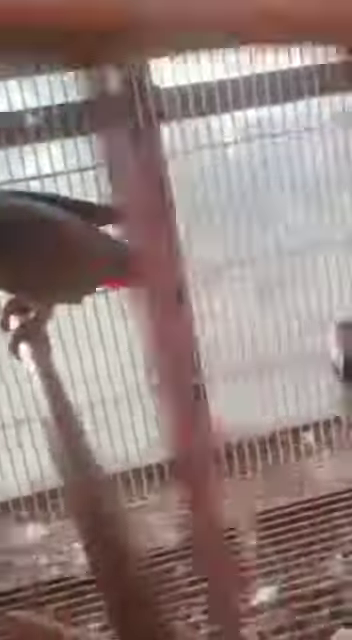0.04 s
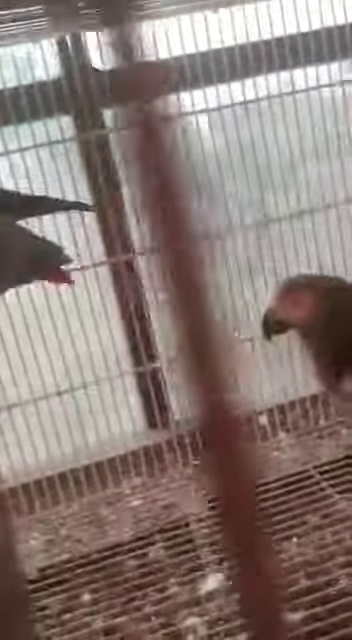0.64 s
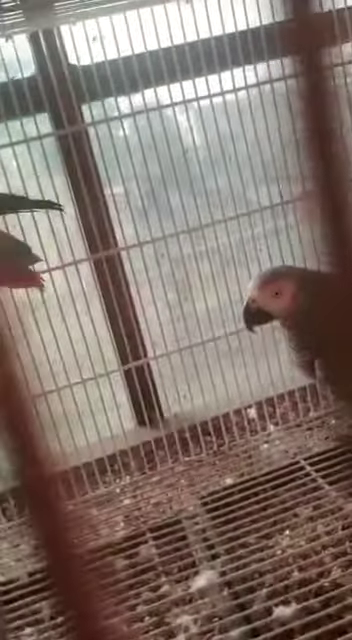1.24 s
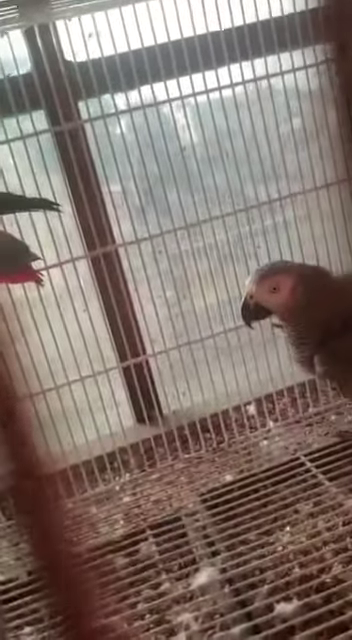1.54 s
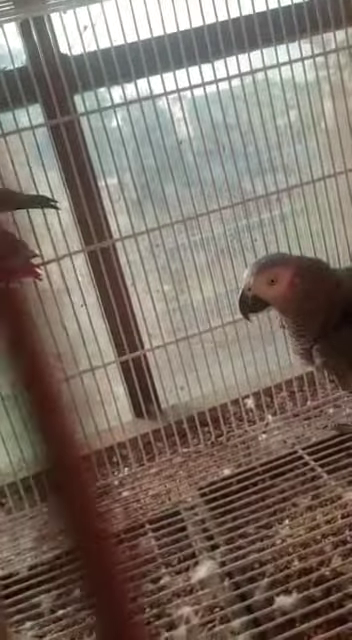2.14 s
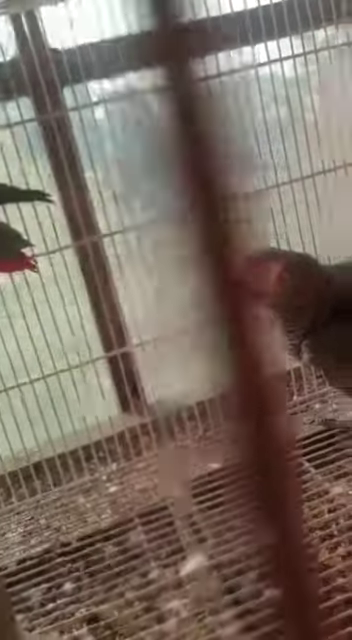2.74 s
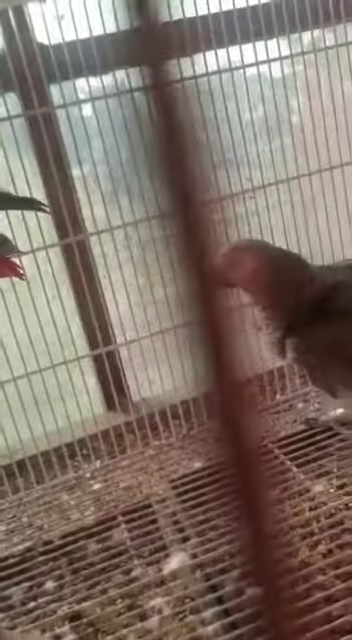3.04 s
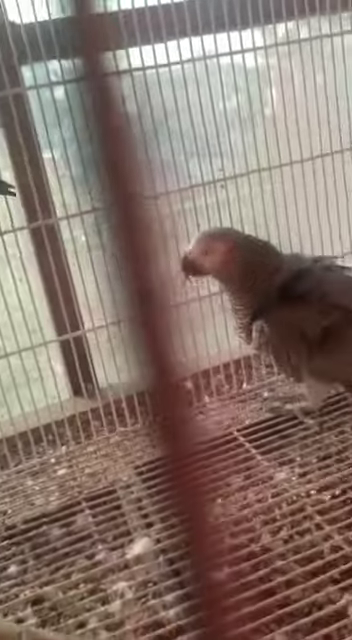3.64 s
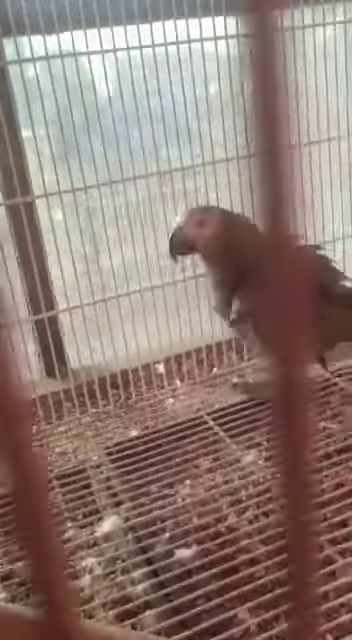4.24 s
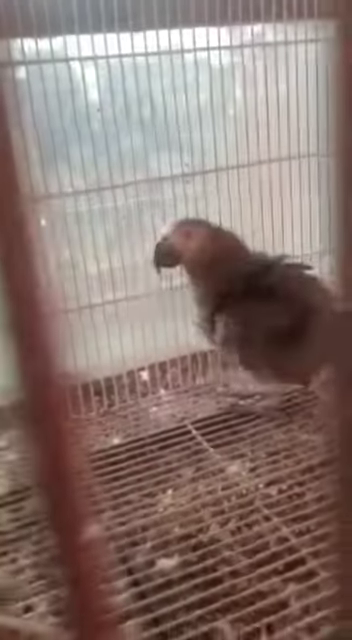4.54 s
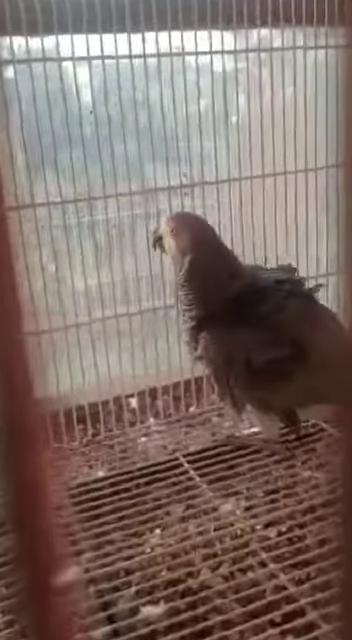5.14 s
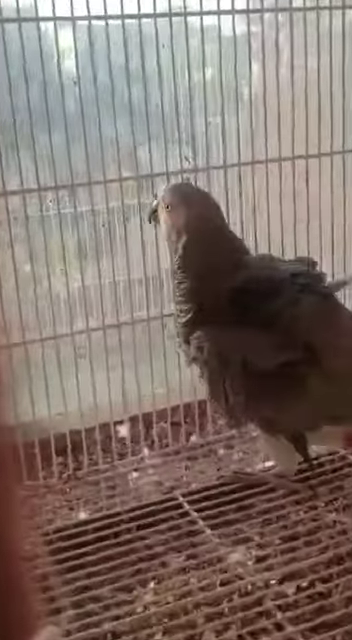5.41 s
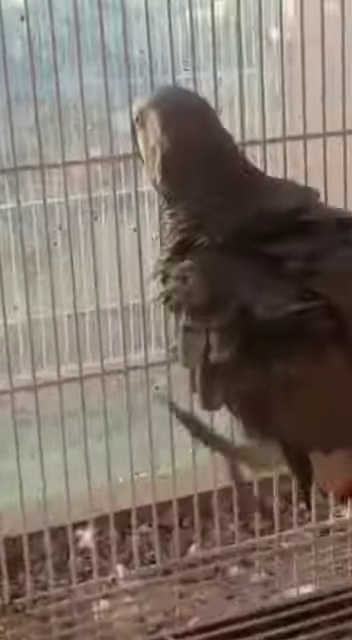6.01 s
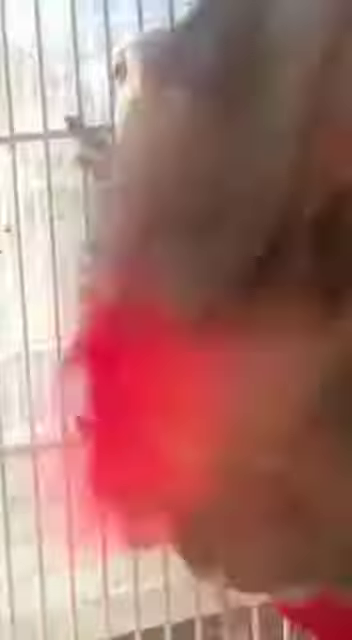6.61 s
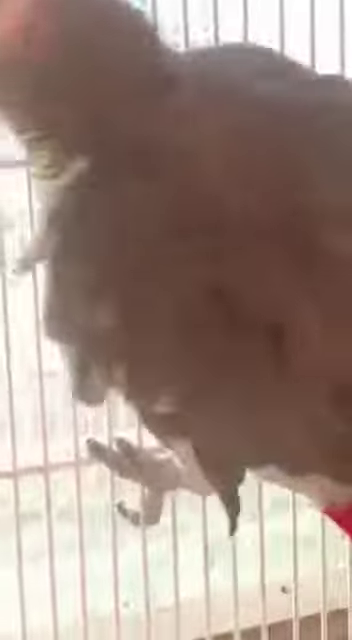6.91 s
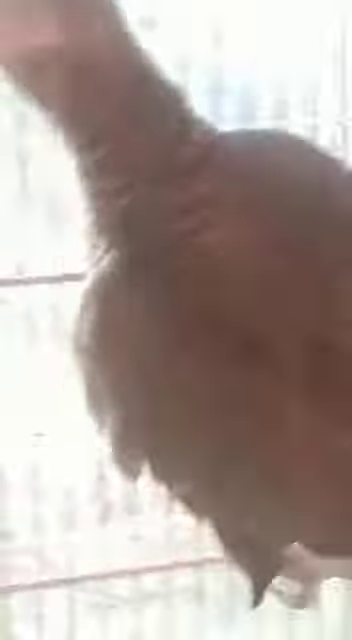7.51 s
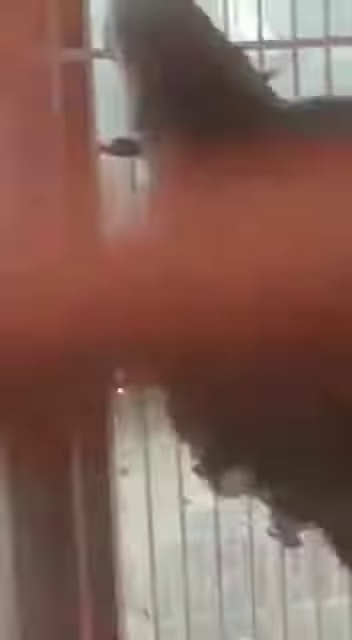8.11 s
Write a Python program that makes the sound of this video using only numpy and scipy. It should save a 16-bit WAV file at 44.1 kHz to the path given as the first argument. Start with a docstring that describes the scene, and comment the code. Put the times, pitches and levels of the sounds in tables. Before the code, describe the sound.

Loud, raspy growls from a caged parrot come in bursts, with soft hisses and throaty rattles between them. One short chirp sounds before the second growl. The wire cage is knocked now and then, more often towards the end, where ticks and light rustling join three quicker growls. The microphone is close, the sound leans left, and the small room rings briefly over a faint hum.

```python
"""A small room, with a wire cage close to a phone whose right port is half covered.
A grey parrot growls harshly seven times: its syrinx flutters and drives the resonances of windpipe
and beak. Between growls come a thin hiss of forced air, a low throaty rattle and one whistled chirp.
Now and then there are knocks on the cage, short bright scrapes and ticks, and faint rustles of
feathers or handling, over a faint rumble and hum. The room rings briefly."""
import sys
import numpy as np
from scipy import signal
from scipy.fft import rfft, irfft, next_fast_len
from scipy.io import wavfile
from scipy.ndimage import uniform_filter1d, minimum_filter1d

SR = 44100
rng = np.random.default_rng(int(sys.argv[2]) if len(sys.argv) > 2 else 0)


def waveform_to_disk(signal):
    """Save audio, clipped to [-1, 1], as 16-bit WAV at the path in sys.argv[1]."""
    frames = np.transpose(np.atleast_2d(signal))
    scaled = np.clip(frames, -1, 1) * 32767
    samples = np.round(scaled).astype(np.int16)
    wavfile.write(sys.argv[1], SR, samples)


N = 364266
TIME = np.arange(N) / SR


def amp(db):
    """Decibels to gain."""
    return 10 ** (np.asarray(db) / 20)


def unit(x):
    """Scales to rms 1."""
    return x / np.sqrt(np.mean(x ** 2) + 1e-20)


def at_hz(points, hz):
    """Reads a spectrum on a log-frequency axis."""
    f, value = np.transpose(points)
    return np.interp(np.log(hz + 1), np.log(f + 1), value)


def ride(points):
    """Follows a fader curve through the whole scene."""
    return np.interp(TIME, *np.transpose(points))


def add(mix, start, sound):
    """Mixes a sound in at start seconds."""
    part = mix[max(round(start * SR), 0):][:len(sound)]
    part += sound[:len(part)]


def wander(t, per_s):
    """Random drift that heads for a new value per_s times a second."""
    return np.interp(t * per_s, np.arange(20000), rng.standard_normal(20000))


def colour(x, points):
    """Minimum-phase EQ with the given curve."""
    log_gain = np.log(amp(at_hz(points, abs(np.fft.fftfreq(8192, 1 / SR)))))
    taps = np.fft.ifft(np.exp(np.conj(signal.hilbert(log_gain)))).real[:4096]
    return signal.oaconvolve(x, taps)[:len(x)]


def steady(x):
    """Evens out the slow level and keeps the single pulses."""
    return x / np.sqrt(abs(uniform_filter1d(x ** 2, 2600)) + 1e-12)


def fade(x, size=300):
    """Softens both ends over size samples."""
    edge = np.minimum(np.arange(len(x)), np.arange(len(x))[::-1])
    return x * np.minimum(edge / size, 1)


def formant(x, hz, width):
    """Two resonators in series follow the curve hz: a steep-sided peak of steady level."""
    turn = np.exp(2j * np.pi * np.cumsum(hz) / SR)
    pole = np.exp(-np.pi * width / SR)
    for _ in range(2):
        x = 2 * (turn * signal.lfilter([1 - pole], [1, -pole], x / turn + 1e-18)).real
    return steady(x)


def syrinx(t, rate, rough, weak_db, jitter, puff_s, leak):
    """A membrane slaps unevenly, strong and weak in turn; each slap lets out a puff of air."""
    cycle = np.cumsum(rate * np.exp(jitter * rough * wander(t, 170))) // SR
    size_db = weak_db * (cycle % 2) + 3.5 * np.clip(rng.standard_normal(len(t)), -2, 1)
    slaps = np.diff(cycle, prepend=-1) * amp(size_db)
    age = np.arange(400) / SR / puff_s
    flow = unit(signal.oaconvolve(slaps, age * np.exp(-age))[:len(t)])
    puffs = unit((leak + flow) * rng.standard_normal(len(t)))
    breathiness = np.clip(0.41 + .5 * rough, 0, 1)
    return np.sqrt(1 - breathiness) * unit(slaps) + np.sqrt(breathiness) * puffs


def effort(t, stutter_s, length, attack_s, release_s):
    """A growl starts with one weak slap, jumps in below full effort, swells to it and lets go."""
    stutter = amp(-15.5) * np.exp(-t / 0.065)
    attack_db = -11.5 * np.exp(-np.maximum(t - stutter_s, 0) / attack_s)
    release_db = -60 * np.maximum(t - length, 0) / release_s
    return np.where(t < stutter_s, stutter, amp(attack_db + release_db))


# The broad rasp between the resonances. Each row: frequency in Hz, gain in dB.
RASP_EQ = [(200, -26), (450, -15), (640, -13), (800, -20), (930, -20), (1150, 4), (1400, 10), (2000, 13),
           (2600, 10.5), (3100, -1.5), (4000, -12), (5300, -15), (6100, -9), (7000, -9), (7700, -47),
           (9200, -13), (11200, -38.5), (12600, -15), (15800, -32.5)]
# The growls. Each row: start, stutter length, start of release, attack and release in seconds,
# effort and its change by the end in dB, slaps a second once loose, roughness and beak gape from 0 to 1,
# main (second) resonance at start and end in Hz, third and fourth resonances in Hz,
# levels of the third, fourth, fifth and the sizzle in dB. Tone is set for a loose syrinx and shut beak.
GROWL_CUES = [ (0.0, .002, .675, 0.02, 0.095, -8.5, -3.5, 142, 0.42, 0, 2025, 2144, 3390, 4440, -6.5, -7.5, -6.5, 7),
              (2.586, 0.0076, 3.576, 0.062, .12, -11, 2, 162, 0.47, 0, 1806, 1995, 3266, 4545, -10, -9, -14, -1),
              (4.01, .011, 4.79, 0.027, 0.14, -8.5, -2.5, 168, .47, 0.22, 1885, 2245, 3350, 4680, -6.5, -6, -8, 8.5),
              (5.424, 0.022, 6.212, 0.039, 0.034, -11.5, 1, 169, 0.33, .04, 2006, 2053, 3140, 4590, -9, -14.5, -9, -2),
              (6.529, 0.0075, 7.077, 0.0093, 0.072, -10.5, 0, 178, .75, 0.77, 2140, 2044, 3170, 4610, -5.5, -9, -5, 9.5),
              (7.337, .014, 7.63, 0.022, 0.037, -5.5, -8, 180, 0.84, 1, 2045, 2110, 3110, 4680, -6, -10, -6, 7),
              (7.931, 0.021, 8.27, 0.012, .1, -12, 0.5, 178, .6, 0.47, 2060, 2170, 3220, 4550, -7, -8, -1, 11)]


def growl(start, stutter_s, end, attack_s, release_s, effort_db, change_db, rate, rough, gape,
          from_hz, to_hz, third_hz, fourth_hz, third_db, fourth_db, fifth_db, sizzle_db):
    """The fluttering syrinx drives the moving resonances of windpipe and beak."""
    length = end - start
    t = np.arange(0, length + release_s, 1 / SR)
    progress = np.minimum(t / length, 1)
    beak = gape * np.sin(np.pi * .92 * progress ** 1.4) ** 2  # opens late, partly shuts by the end
    tight = np.exp(-t / .27)  # the syrinx starts tight: cleaner, faster, less sizzle
    rough = rough * (1 - .35 * tight)
    rate = np.where(t < stutter_s, 1 / stutter_s, rate * (1 + .13 * tight))
    sizzle_db = sizzle_db - 8 * tight
    drive = syrinx(t, rate, rough, weak_db=-5.5, jitter=.18, puff_s=0.00066, leak=0.47)
    main_hz = from_hz + (to_hz - from_hz) * progress + 70.4 * beak
    third_hz = third_hz + 780 * beak
    fourth_hz = fourth_hz + 476 * beak
    fourth_db = fourth_db - 4.5 * beak - 4 * tight
    # Each resonance: centre in Hz, width in Hz, level in dB.
    throat = [(998 + 416 * beak ** 2, 133, -12.5 + 3 * beak),  # only a wide gape lifts the lowest
              (main_hz, 293, 0),
              (third_hz, 383, third_db - 6.5 * beak + 1.5 * tight),
              (fourth_hz, 490, fourth_db),
              (6620, 445, fifth_db - 16.5 * beak - 5.5 * tight)]
    side_peaks = [(0.867 * main_hz, 380, -14.5), (0.851 * third_hz, 300, -17),
                  (1.12 * fourth_hz, 1100, fourth_db - 4.5), (1.765 * fourth_hz, 1100, sizzle_db - 29)]
    rasp = steady(colour(drive, RASP_EQ))
    sizzle = signal.sosfiltfilt(signal.butter(4, 7500, "high", fs=SR, output="sos"), rasp)
    voice = amp(-5) * (rasp + (amp(sizzle_db) - 1) * sizzle)
    for hz, width, level_db in throat + side_peaks:
        # the rougher the growl, the more each resonance shakes in strength and pitch
        shake_db = 4.3 * rough ** 2 * wander(t, 22)
        detune = 0.045 * rough ** 2 * wander(t, 45)
        voice = voice + amp(level_db + shake_db) * formant(drive, hz * (1 + detune), width)
    catch_db = -7.5 * np.exp(-((start + t - 7.515) / .024) ** 2)  # the voice catches in the sixth growl
    tremble_db = 1.5 * rough * wander(t, 70.3)  # the slaps come in uneven clumps
    gain = amp(effort_db + change_db * progress + catch_db + tremble_db)
    envelope = effort(t, stutter_s, length, attack_s, release_s)
    return start, fade(gain * envelope * steady(voice), size=40)


# The tone of the rumble. Each row: frequency in Hz, gain in dB.
RUMBLE_EQ = [(12, -38), (20, -9.5), (70, 8.5), (113, -4.5), (167, 0.5), (206, -4), (229, -1), (293, -10.5),
             (347, -21.5), (375, -5), (411, -9), (450, -6.5), (580, -18.5), (990, -120)]
# The rumble's fader. Each row: time in seconds, level in dB.
RUMBLE_RIDE = [(0, -46), (.8, -53.5), (1.4, -47.5), (2.0, -43), (2.6, -42), (3.2, -49.5), (6.25, -50),
               (6.76, -41), (7.3, -43), (8.26, -52)]
# The tone of the air. Each row: frequency in Hz, gain in dB.
AIR_EQ = [(150, -36), (250, -5), (1530, -8), (2160, -5), (3230, -11.5), (6590, -14.5), (7840, -24),
          (14000, -41), (16000, -59)]


def room_tone():
    """A bed of swelling low rumble, mostly shared by the two ports, and faint wide air."""
    shared, left, right = (unit(colour(rng.standard_normal(N), RUMBLE_EQ)) for _ in range(3))
    swell = amp(ride(RUMBLE_RIDE) - 0.5 + 4.0 * wander(TIME, 9))
    rumble = swell * (shared + 0.47 * np.array([left, right]))
    air = np.array([unit(colour(rng.standard_normal(N), AIR_EQ)) for _ in range(2)])
    return rumble + amp(-44) * air


# The hum's fader. Each row: time in seconds, level in dB.
HUM_RIDE = [(0, -68), (1.0, -58), (1.2, -48), (1.9, -48.5), (2.8, -55), (3.9, -46), (5.2, -55.5),
            (8.26, -67)]


def hum():
    """A narrow band of noise makes a low, wavering hum."""
    return amp(ride(HUM_RIDE)) * unit(formant(rng.standard_normal(N), hz=np.full(N, 169), width=33))


# The tone of the breath. Each row: frequency in Hz, gain in dB.
HISS_EQ = [(600, -1), (1500, 1), (2300, 4), (3200, 0.5), (4400, 11.5), (5400, -12.5), (6600, 6),
           (7700, -58), (9200, -19), (11000, -24), (13500, -11), (16000, -26)]
# The thin hissing calls. Each row: start and length in seconds, level in dB, mid-call whistle pitch
# in Hz, trims for that whistle and for the hollow note an octave below in dB.
HISS_CUES = [(0.722, 0.45, -59, 4600, -19, -14), (1.044, 0.22, -44.5, 4660, 2, -22),
             (1.121, 0.27, -41.5, 4470, -2, -25), (1.39, .38, -40, 4380, -1.5, -4),
             (1.775, 0.25, -42, 4370, -2.5, 1.5), (1.991, 0.23, -41.5, 4300, 0, -5),
             (2.189, 0.46, -39.5, 4360, -8.5, -5), (3.66, .13, -53, 4590, -8, -3),
             (3.847, 0.18, -48.5, 4390, -5, 4.5), (4.786, 0.4, -46.5, 4320, -5, 3),
             (6.239, 0.17, -47, 4530, -11, 3), (6.428, 0.12, -47, 4360, -14, 6.5),
             (7.091, 0.54, -40.5, 4460, -7, 0), (7.625, 0.21, -40, 4240, -11, -11),
             (7.781, 0.14, -47, 4160, -20, 0)]


def hiss(start, length, level_db, whistle_hz, whistle_db, hollow_db):
    """Air forced through a narrow throat swells and fades while its faint whistles slide down."""
    t = np.arange(0, length, 1 / SR)
    slide = 1 + .06 * (.5 - t / length)
    low_hz, high_hz = whistle_hz * slide, 6440 * slide
    jet = rng.standard_normal(len(t)) * amp(2.5 * wander(t, 62.4))
    breath = amp(-1.0) * unit(colour(jet, HISS_EQ))
    whistles = [(0.71 * low_hz, 500, -11), (low_hz, 280, whistle_db),
                (high_hz, 520, 0), (2.0 * low_hz, 800, -16)]
    for hz, width, tone_db in whistles:
        flicker = amp(tone_db + 4.3 * wander(t, 15))
        breath = breath + flicker * formant(jet, hz * (1 + 0.017 * wander(t, 15)), width)
    hollow = amp(hollow_db - 5.0) * formant(jet, 0.5 * low_hz, width=360)
    arch_db = -8.5 * (1 - np.sin(np.pi * t / length))
    return start, fade(amp(level_db + 4.0 + arch_db) * (steady(breath) + hollow), size=600)


# The muffled tone of a shut beak. Each row: frequency in Hz, gain in dB.
RATTLE_EQ = [(120, -27), (380, -3.5), (600, -5), (920, -1.5), (1200, -8), (1800, -5.5), (2800, -20),
             (5000, -77), (12000, -62)]
# The low rattles. Each row: start in seconds, length in seconds, level in dB.
RATTLE_CUES = [(1.219, 0.13, -51.5), (1.418, 0.087, -54.5), (2.348, 0.42, -43.5), (3.768, 0.32, -47),
               (5.147, 0.37, -48), (6.349, 0.2, -47), (7.166, 0.22, -51.5)]


def rattle(start, length, level_db):
    """Slow, dull flaps of the syrinx swell slightly behind a shut beak."""
    t = np.arange(0, length, 1 / SR)
    flaps = syrinx(t, rate=98, rough=0.44, weak_db=-1.0, jitter=.4, puff_s=0.0011, leak=0.12)
    swell = amp(level_db + 6.75 + 2.5 * t / length)
    return start, fade(swell * steady(colour(flaps, RATTLE_EQ)))


def burst(t60, eq):
    """A dense cluster of dying vibrations, peak 1."""
    t = np.arange(16000) / SR
    cluster = colour(rng.standard_normal(len(t)) * amp(-60 * t / t60), eq)
    return cluster / abs(cluster).max()


# The boom of the frame. Each row: frequency in Hz, gain in dB.
FRAME_EQ = [(30, -8), (80, -4), (190, -4), (400, -7.5), (600, -14), (1500, -20.5), (6000, -92)]
# The clack of the wires. Each row: frequency in Hz, gain in dB.
CLACK_EQ = [(200, -49), (500, -8), (900, 16), (1800, 21), (3000, 1), (7000, -26), (15000, -34)]
# The knocks on the cage. Each row: start in seconds, level in dB, ring time in seconds,
# clack and thud trims in dB, lean of boom and clack to the left in dB.
KNOCK_CUES = [(1.764, -14.5, 0.065, -5, -19, 18), (2.779, -11.5, 0.11, -2, -31, 13),
              (4.333, -8, 0.13, -14, -24, 23), (4.785, -17.5, 0.057, 12, -30, 23),
              (6.305, -11, 0.15, -12.5, -33, 18), (6.323, -12.5, 0.19, -7, -35, 17),
              (6.567, -20.5, 0.057, 14, -21, 6), (6.605, -11.5, 0.31, -10, -2.5, 6.5),
              (6.705, -13, 0.14, -20, -3, 15), (6.796, -15, .076, -4, -7, 6), (7.174, -24, .06, -2, -17, 4)]


def knock(level_db, t60, clack_db, thud_db, left_db):
    """The frame booms, the wires clack and the phone takes a low push that sags in pitch."""
    ring = burst(t60, FRAME_EQ) + amp(clack_db - 3.0) * burst(0.023, CLACK_EQ)
    t = np.arange(len(ring)) / SR
    thud_hz, sag_s, thud_t60, right_lag_rad = 69, 0.155, .42, 1.16
    phase = 2 * np.pi * thud_hz * sag_s * (1 - np.exp(-t / sag_s))
    push = np.array([fade(np.sin(phase - lag), size=150) for lag in (0, right_lag_rad)])
    thud = amp(thud_db - 3.0 - 60 * t / thud_t60) * push
    return amp(level_db - 3.5) * (np.array([ring, amp(-left_db) * ring]) + thud)


# The notes of the chirp. Each row: start and length in seconds, first and last pitch in Hz, level in dB.
CHIRP_NOTES = [(2.311, 0.024, 3000, 2770, -26), (2.333, .05, 3260, 3090, -21.5),
               (2.4, .05, 3095, 2147, -23.5)]


def chirp(start, length, from_hz, to_hz, level_db):
    """A quavering whistled note slides down, a little faster towards its end."""
    t = np.arange(0, length, 1 / SR)
    hz = from_hz + (to_hz - from_hz) * (t / length) ** 1.15
    quaver = 1 + 0.048 * wander(t, 715)
    phase = 2 * np.pi * np.cumsum(hz * quaver) / SR
    arch = np.sin(np.pi * (t / length) ** 0.77)
    gain = amp(level_db + 3.5 + 2 * wander(t, 320)) * arch
    return start, gain * (np.sin(phase) + amp(-39) * np.sin(2 * phase))


# The bright tone of scrapes, ticks and rustles. Each row: frequency in Hz, gain in dB.
SCRAPE_RUSTLE_EQ = [(500, 12), (2000, 9), (6000, 14), (10000, 6), (12500, 12), (16000, 14)]
# Short bright scrapes and ticks, and faint longer rustles of feathers or handling.
# Each row: start in seconds, level in dB, seconds to die away by 30 dB.
SCRAPE_RUSTLE_CUES = [(3.387, -38, 0.12), (6.3046, -34, 0.072), (6.7233, -24, 0.098), (7.09, -35, .25),
                      (7.1743, -21, 0.028), (7.21, -37.5, 0.67), (7.34, -25, 0.13), (7.659, -39.5, 0.37),
                      (7.8224, -32.5, 0.2)]


def scrape_or_rustle(start, level_db, t30):
    """Bright dying noise: a scrape or tick when short, a rustle of feathers or handling when long."""
    return start, amp(level_db + 9.5) * fade(burst(2 * t30, SCRAPE_RUSTLE_EQ), size=200)


# The small room's decay. Each row: frequency in Hz, seconds to die away by 60 dB.
ROOM_DECAY = [(150, 1), (800, 0.29), (2100, 0.45), (5500, 0.25), (14000, 0.3)]


def room(x, tail_db, early_db, early_s):
    """Quick reflections from the cage tray and walls, then a short tail."""
    t = np.arange(22000) / SR
    reflections = rng.standard_normal(len(t)) * (rng.random(len(t)) < .06)
    early = reflections * np.exp(-t / early_s) * (t > .001)
    hz, age, bands = signal.stft(reflections * (t > .008), SR, nperseg=256)
    decay = amp(-60 * age / at_hz(ROOM_DECAY, hz)[:, None])
    tail = signal.istft(bands * decay, SR, nperseg=256)[1][:len(t)]
    echo = amp(early_db) * early / np.linalg.norm(early) + amp(tail_db) * tail / np.linalg.norm(tail)
    return x + signal.oaconvolve(x, echo)[:N]


# The muffling of the half-covered port. Each row: frequency in Hz, gain in dB.
COVER_EQ = [(40, -2), (130, -0.5), (350, -5), (700, -10.5), (1300, -16), (2200, -20.5), (4200, -22.5),
            (6500, -44), (9000, -32.5), (13000, -19), (16000, -13)]


def covered_port(x, lag_s):
    """The right port hears the room dull and a little later."""
    size = next_fast_len(N + 4096)
    hz = np.fft.rfftfreq(size, 1 / SR)
    delay = np.exp(-2j * np.pi * hz * lag_s)
    return irfft(rfft(x, size) * amp(at_hz(COVER_EQ, hz)) * delay, size)[:N]


def scene():
    """Bird and cage in the room, heard at an open and a covered port."""
    close, knocks = np.zeros(N), np.zeros((2, N))
    for source, cues in [(growl, GROWL_CUES), (hiss, HISS_CUES), (rattle, RATTLE_CUES),
                         (chirp, CHIRP_NOTES), (scrape_or_rustle, SCRAPE_RUSTLE_CUES)]:
        for cue in cues:
            add(close, *source(*cue))
    for start, *blow in KNOCK_CUES:  # knocks travel through the phone's body, past room and cover
        for port, sound in zip(knocks, knock(*blow)):
            add(port, start, sound)
    bed = room_tone() + hum()
    left = room(close, tail_db=-9.0, early_db=-8.5, early_s=0.012) + bed[0]
    right = room(close, tail_db=-3.5, early_db=1.5, early_s=.006) + bed[1]
    return np.array([left, amp(-0.3) * covered_port(right, lag_s=0.00029)]) + knocks


def record(dry):
    """A fast limiter holds the peaks under full scale; a steep low-pass trims the very top."""
    needed_gain = np.minimum(1, .98 / (abs(dry).max(0) + 1e-9))
    gain = uniform_filter1d(minimum_filter1d(needed_gain, size=90), size=90)
    low_pass = signal.firwin(511, cutoff=15900, window=("kaiser", 9), fs=SR)
    return signal.oaconvolve(dry * gain, low_pass[None], "same")


dry = scene()
out = record(dry)
waveform_to_disk(out)
```